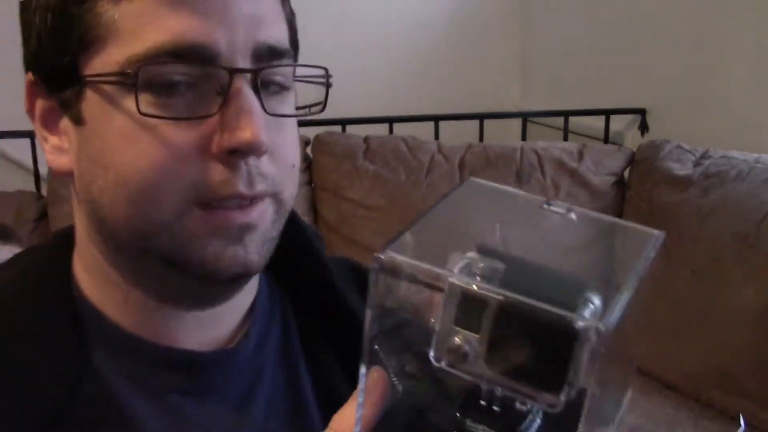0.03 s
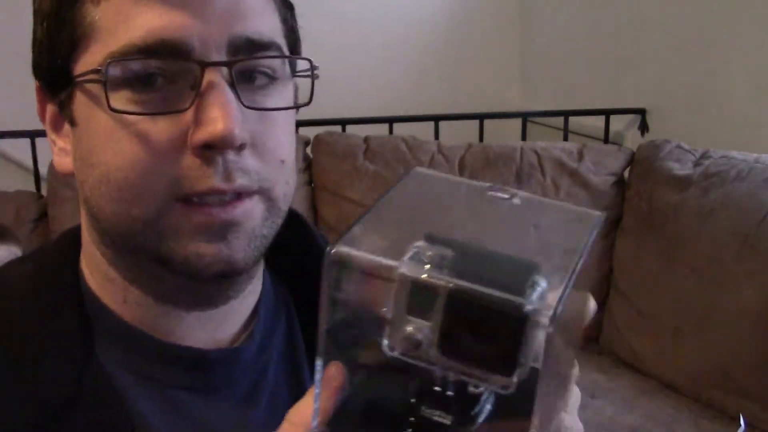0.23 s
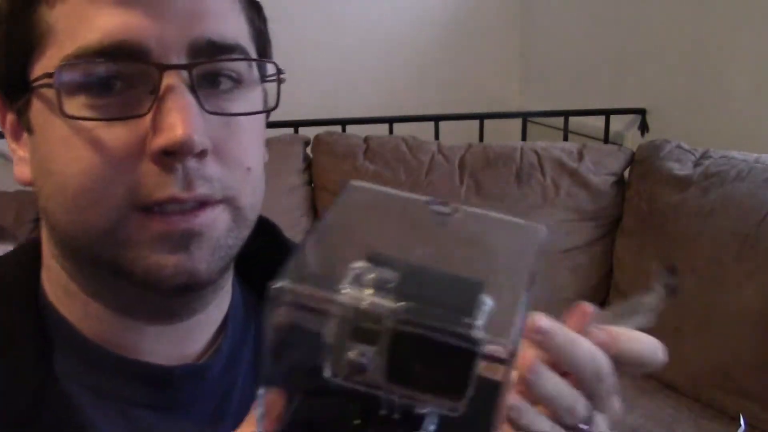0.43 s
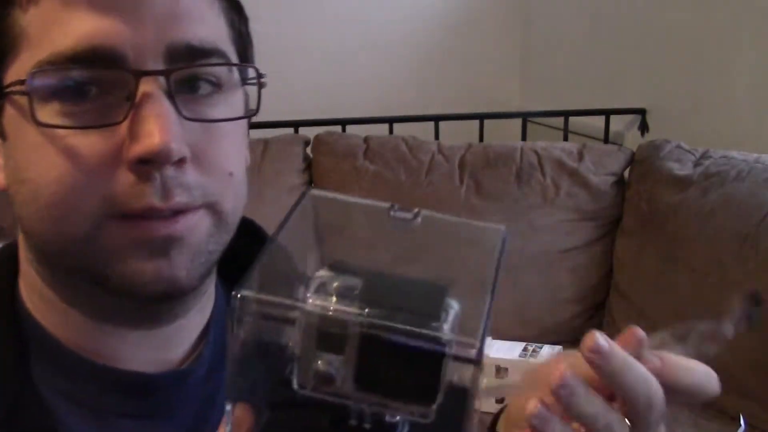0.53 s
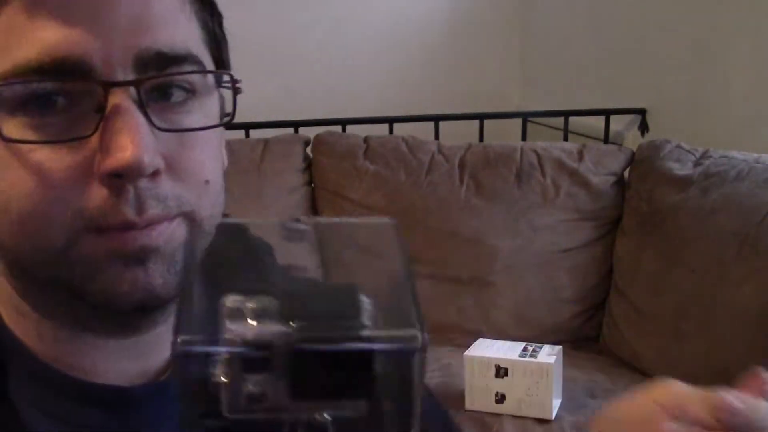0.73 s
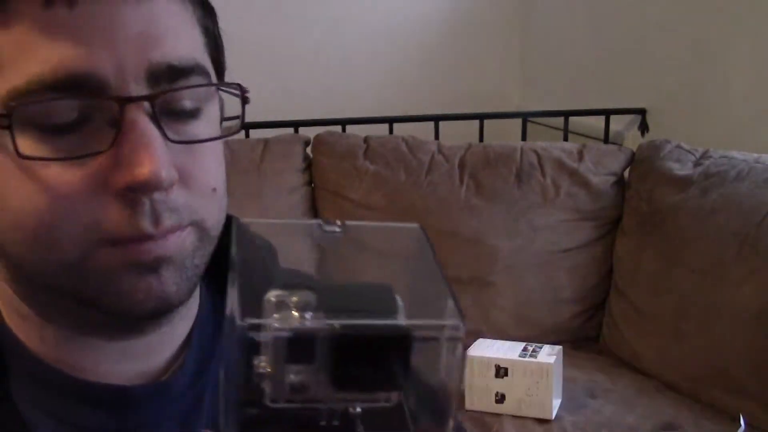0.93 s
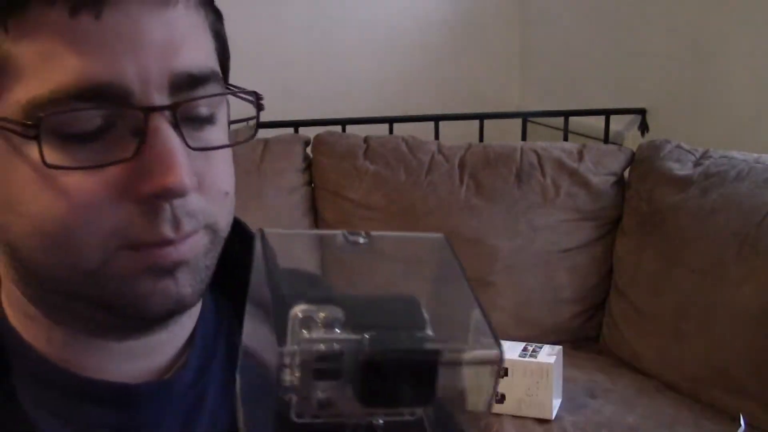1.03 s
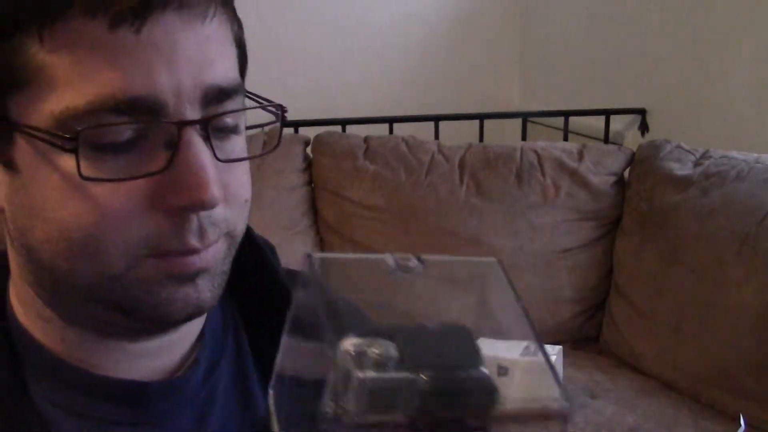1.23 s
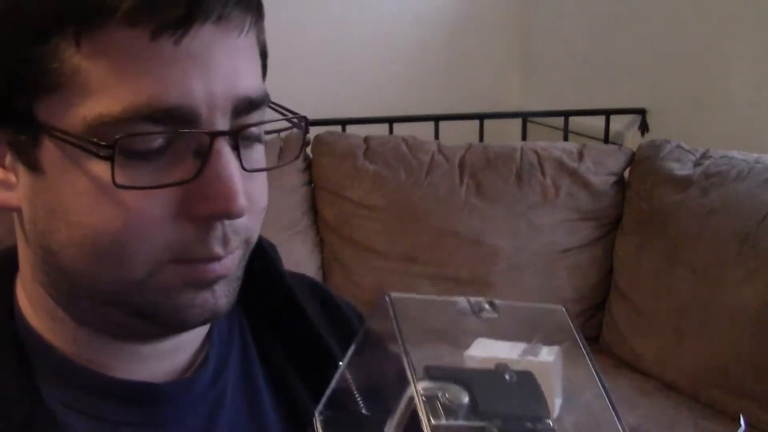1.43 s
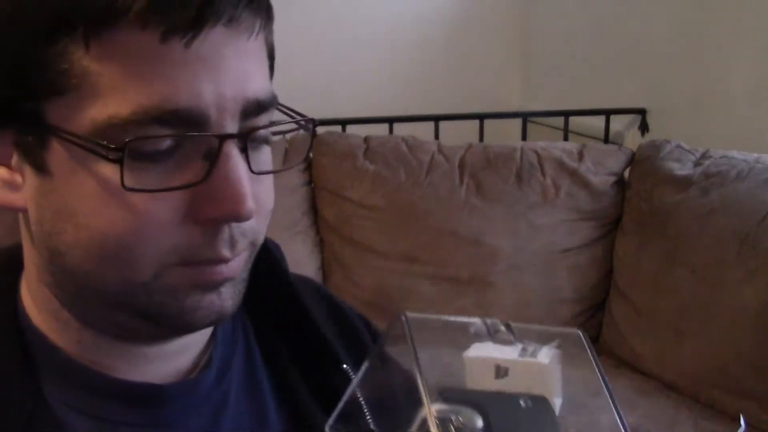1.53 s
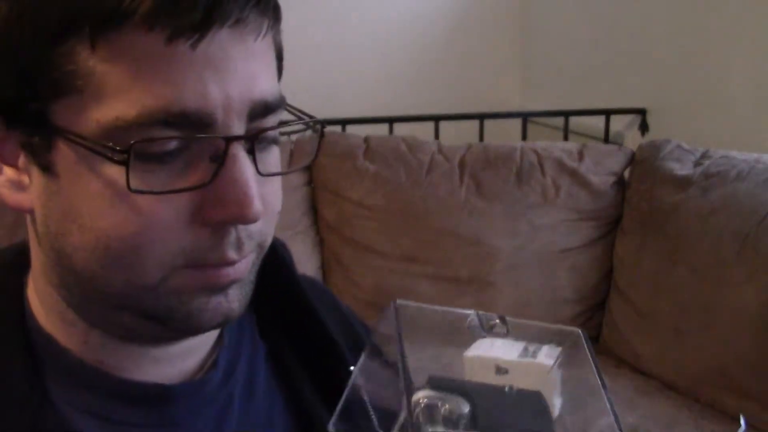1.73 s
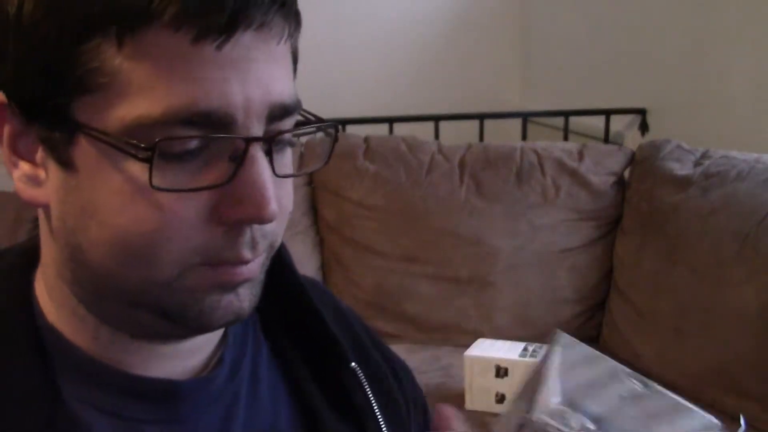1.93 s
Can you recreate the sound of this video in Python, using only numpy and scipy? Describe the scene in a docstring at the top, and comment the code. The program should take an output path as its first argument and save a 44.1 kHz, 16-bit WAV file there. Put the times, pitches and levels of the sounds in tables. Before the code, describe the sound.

Hard plastic packaging is torn open with raspy crackles, a sharp snap, clacks and small ticks

```python
"""Living room, close up: a sealing strip is ripped off a hollow hard plastic case in three pulls.
The strip sticks and slips: each slip is a burst of shaped noise and a kick to the decaying case modes.
The last pull snaps, with short pings, and runs into a bright rip. Knocks are a thump, clack and ring.
The freed case knocks about, then ticks and bumps softly in the hands; ticks are short filtered
contacts, the finger rub is gritty noise. Room echoes and a faint noise floor surround it."""
import sys
import numpy as np
from scipy import signal
from scipy.fft import rfft, irfft, next_fast_len
from scipy.io import wavfile
from scipy.ndimage import map_coordinates

SR = 44100
rng = np.random.default_rng(int(sys.argv[2]) if len(sys.argv) > 2 else 0)


def transcribe(u):
    """Save the signal u as a 16-bit wav file named by the first command-line argument.

    u: samples, shape (n,) or (channels, n), limited to [-1, 1]; the rate is SR.
    q: integer samples, one column per channel.
    """
    v = np.clip(np.atleast_2d(u).T, -1, 1)
    q = np.round(v * 32767).astype(np.int16)
    wavfile.write(sys.argv[1], SR, q)


N = 88200


def amp(db):
    """Decibels to gain."""
    return 10 ** (np.asarray(db) / 20)


def unit(x):
    """Scale to rms 1."""
    return x / np.sqrt(np.mean(x ** 2) + 1e-20)


def along(points, hz):
    """Interpolate (hz, value) points on a log-frequency axis."""
    point_hz, value = np.transpose(points)
    return np.interp(np.log(hz + 1), np.log(point_hz + 1), value)


def colour(x, points):
    """Minimum-phase filter with the given (hz, db) shape, built by folding the cepstrum."""
    m = 2 * next_fast_len(x.shape[-1])
    log_gain = np.log(amp(along(points, np.fft.rfftfreq(m, 1 / SR))))
    cepstrum = irfft(log_gain, m)
    cepstrum[1:m // 2] *= 2
    cepstrum[m // 2 + 1:] = 0
    response = np.exp(rfft(cepstrum))
    return irfft(rfft(x, m) * response, m)[..., :x.shape[-1]]


def highpass(x, order, hz):
    """Causal Butterworth high-pass."""
    return signal.sosfilt(signal.butter(order, hz, 'high', fs=SR, output='sos'), x)


def fade(t_s, t60_s):
    """Exponential decay by 60 dB in t60_s."""
    return np.exp(-np.log(1000) * t_s / t60_s)


def decaying_sine(t_s, hz, t60_s):
    """One damped mode."""
    return fade(t_s, t60_s) * np.sin(2 * np.pi * hz * t_s)


def add(out, start_s, x):
    """Mix x into out from start_s."""
    i = int(round(start_s * SR))
    n = min(x.shape[-1], out.shape[-1] - i)
    out[..., i:i + n] += x[..., :n]


# side level of diffuse sound: [hz, side_db]
SIDE_WIDTH = [(30, -12.5), (100, -10), (350, -23.5), (1000, -19.5), (4000, -14), (9000, -5), (14000, -3.5)]


def diffuse(pair):
    """Two unrelated signals as mid and side of one diffuse field."""
    side = colour(pair[1], SIDE_WIDTH)
    return np.array([pair[0] + side, pair[0] - side])


# spectrum of the background: [hz, level_db]
FLOOR_TONE = [(20, -42.5), (45, -39.5), (70, -19), (130, -12.5), (200, -11.5), (270, -9.5), (350, -6),
              (450, -7), (600, -8), (800, -9), (1050, -12.5), (1600, -12), (2200, -16), (3400, -25),
              (4500, -32.5), (16000, -50.5)]
FLOOR_MID_DB, FLOOR_SLOPE_DB_PER_S = -51, -2


def background():
    """Diffuse coloured noise whose level falls slowly."""
    floor = amp(FLOOR_MID_DB) * unit(diffuse(colour(rng.standard_normal((2, N)), FLOOR_TONE)))
    from_middle_s = (np.arange(N) - N / 2) / SR
    return floor * amp(FLOOR_SLOPE_DB_PER_S * from_middle_s)


def contact(tone, t60_s, rough):
    """One push with a brief rough aftershock, coloured by the tone; peak 1."""
    t = np.arange(SR // 8) / SR
    push = rng.standard_normal(len(t)) * fade(t, t60_s)
    push *= rough / np.linalg.norm(push)
    push[0] += 1
    x = colour(push, tone)
    return x / np.abs(x).max()


# finger rub before flutter: [time_s, level_db]
RUB_LEVEL = [(0, -72), (.2, -57), (.65, -56), (1.0, -60), (1.09, -64), (1.14, -68), (1.17, -49),
             (1.2, -71.5), (1.3, -68.5), (1.34, -60), (1.41, -60), (1.45, -78), (1.52, -70.5),
             (1.56, -62.5), (1.63, -59.5), (1.71, -84), (2, -86)]
# spectrum of the rub: [hz, level_db]
RUB_TONE = [(300, -10.5), (2000, 1.5), (4000, 0), (5400, -7.5), (6500, -0.5), (8000, -2.5), (12000, -7),
            (16000, -21)]
RUB_GRAIN = .65  # log spread of sample size: grittiness


def finger_rub(flutter_db=5.0, flutter_points_per_s=90):
    """Fingers sliding on the case: uneven noise grains with a fluttering level."""
    t = np.arange(N) / SR
    flutter = map_coordinates(rng.standard_normal(size=1000), [t * flutter_points_per_s], mode='wrap')
    grit = rng.standard_normal(N) * np.exp(RUB_GRAIN * rng.standard_normal(N))
    level_db = np.interp(t, *np.transpose(RUB_LEVEL))
    return unit(colour(grit, RUB_TONE)) * amp(level_db + flutter_db * flutter)


# plastic on plastic: [start_s, level_db, pitch_hz]
TICKS = [(.034, -43, 3820), (.076, -42, 3540), (1.071, -17.5, 7800), (1.1125, -32, 3750),
         (1.1195, -31, 7070), (1.162, -42, 3320), (1.165, -39, 5950), (1.17, -37.5, 3850),
         (1.172, -34, 6800), (1.1885, -42, 7900), (1.3225, -40.5, 7100), (1.340, -41.5, 7000),
         (1.349, -42, 6960), (1.356, -44, 6700), (1.3695, -38, 7500), (1.3845, -40, 7000),
         (1.397, -34.5, 8520), (1.4725, -40.5, 6960), (1.508, -27.5, 3760), (1.622, -31, 3130),
         (1.623, -34.5, 7900), (1.636, -42, 5050), (1.995, -34.5, 7000)]
# tick spectrum: [multiple_of_pitch, level_db]
TICK_SHAPE = [(.1, -42), (.55, -14.5), (.68, -1.5), (.82, -8), (1, 1), (1.2, -9), (2, -17.5), (4, -41.5)]


def ticks():
    """Small dry contacts, each with a spectral peak about its own pitch."""
    out = np.zeros(N)
    for start_s, level_db, pitch_hz in TICKS:
        tone = [(pitch_hz * multiple, db) for multiple, db in TICK_SHAPE]
        add(out, start_s, amp(level_db) * contact(tone, t60_s=0.0016, rough=0.4))
    return out


# modes of the hollow case: [mode_hz, level_db, t60_s]
CASE_MODES = [(358.6, 3.5, 0.11), (466.5, 3, 0.2), (584, 2, 0.095), (715, -8.5, 0.064), (905, -16, 0.1),
              (974, -10, .08), (1618, 0.5, 0.023), (2580, -4.5, .08)]
MODE_FALL_DB_PER_OCT = 9  # away from the pitch of the touch


def case_ring(centre_hz, scatter_db=1.5, low_hz=300):
    """Damped case modes: a touch rings most those near its pitch, a little differently each time."""
    t = np.arange(SR // 3) / SR
    ring = np.zeros(len(t))
    for mode_hz, level_db, t60_s in CASE_MODES:
        fall_db = MODE_FALL_DB_PER_OCT * abs(np.log2(mode_hz / centre_hz))
        mode_db = level_db + scatter_db * rng.standard_normal() - fall_db
        ring += amp(mode_db) * decaying_sine(t, mode_hz, t60_s)
    return highpass(ring, 4, low_hz)


SLIP_REF_DB, RATE_DOUBLING_DB = -22, 9.5  # level at the nominal slip rate; rise that doubles it
SLIP_JITTER, SLIP_SCATTER_DB = .12, 1.0  # log spread of the gaps; spread of the sizes
SLIP_RISE_S, SLIP_T60_S = .001, .011


def pull(curve, tone, tear_db, gain_db, case_db, case_hz, slips_per_s, treble_hz=5500, grain=.25):
    """Stick-slip at an uneven rate: each slip is tiny breaks in the glue and a kick to the case."""
    time_s, curve_db, treble_db = np.transpose(curve)
    t = np.arange(time_s[0], time_s[-1], 1 / SR)
    level_db = np.interp(t, time_s, curve_db)
    effort = amp(level_db + gain_db)

    # louder pulling slips faster; a slip falls where the running slip count passes a jittered step
    rate = slips_per_s * 2 ** ((level_db - SLIP_REF_DB) / RATE_DOUBLING_DB)
    chance = rng.standard_normal(size=(200, 2))
    gaps = np.exp(SLIP_JITTER * chance[:, 0])
    at = np.searchsorted(np.cumsum(rate) / SR, np.cumsum(gaps) - gaps[0])
    inside = at < len(t)
    sizes = amp(SLIP_SCATTER_DB * chance[inside, 1]) / np.sqrt(rate[at[inside]])
    slips = np.bincount(at[inside], sizes, len(t))

    slip_shape = fade(t - t[0], SLIP_T60_S) * (1 - np.exp((t[0] - t) / SLIP_RISE_S))
    power = signal.fftconvolve(slips ** 2, slip_shape ** 2)[:len(t)]
    envelope = unit(np.sqrt(np.abs(power)))
    breaks = unit(rng.standard_normal(N) * np.exp(grain * rng.standard_normal(N)))[:len(t)]
    burst = effort * (envelope + amp(tear_db)) * breaks
    crackle = colour(np.pad(burst, (0, SR // 8)), tone)
    crackle *= np.linalg.norm(effort) / np.linalg.norm(crackle)

    treble_filter = signal.butter(2, treble_hz, 'high', fs=SR, output='sos')
    treble = signal.sosfiltfilt(treble_filter, crackle, padtype=None)
    crackle_s = time_s[0] + np.arange(len(crackle)) / SR
    treble_gain = amp(np.interp(crackle_s, time_s, treble_db - treble_db.mean()))
    crackle += treble * (treble_gain - 1)

    body = signal.fftconvolve(slips * effort, case_ring(case_hz))
    body *= amp(case_db) * np.linalg.norm(effort) / np.linalg.norm(body)
    out = np.zeros(N)
    add(out, time_s[0], crackle)
    add(out, time_s[0], body)
    return out


# strip pulls: [time_s, level_db, treble_db], treble taken relative to the pull's mean
FIRST_PULL = [(.235, -24, -21.5), (.240, -19.5, -13), (.249, -23.5, 1), (.253, -28.5, -2.5),
              (.258, -22, -6), (.267, -25, 0.5), (.271, -19.5, -16), (.295, -17.5, -15),
              (.302, -30.5, -7.5), (.309, -23, 1), (.321, -31.5, -18.5), (.335, -21, -18.5),
              (.342, -22, -8)]
SECOND_PULL = [(.3955, -18, -7), (.407, -19.5, -16), (.419, -22.5, -14), (.426, -33.5, 5.5),
               (.436, -24, -8), (.450, -27, -7.5), (.468, -23, -4), (.493, -22, -11), (.502, -19, -5.5),
               (.521, -23, -1.5), (.532, -20.5, -2), (.551, -24, -8.5), (.559, -28.5, 8.5)]
LAST_PULL = [(0.739, -17, 2), (0.753, -19, -2.5), (0.771, -13.5, 3.5), (0.795, -12.5, -2),
             (0.816, -15.5, -16)]
# crackle spectrum of each pull: [hz, level_db]
FIRST_TONE = [(60, -37), (200, -28), (290, -21.5), (370, 3), (620, -4.5), (800, 2.5), (1100, -4.5),
              (1900, -6), (3300, -3), (5500, -7.5), (7800, -7.5), (13000, -18), (16000, -33)]
SECOND_TONE = [(60, -37), (200, -29.5), (290, -23), (370, -3.5), (620, -5), (900, -8), (2000, -9.5),
               (2700, -4), (4500, -12), (6900, -6), (10000, -17), (13500, -24), (16000, -37)]
LAST_TONE = [(59, -70.5), (100, -28.5), (461, -3.5), (991, -7), (1230, -5.5), (1330, -8.5), (2170, -5),
             (2630, -7.5), (2990, -6), (5770, -9), (8110, -5), (13200, -14.5), (16000, -25.5)]
# tearing between the slips, relative to the slips: [first_db, second_db, last_db]
TEAR_DB = (-4, -15, 2)


def strip_pulls():
    """Two rasping pulls and the final rip, each with its own tone, slip rate and case pitch."""
    out = pull(FIRST_PULL, FIRST_TONE, TEAR_DB[0], gain_db=-0.5, case_db=-12.5, case_hz=780, slips_per_s=170)
    out += pull(SECOND_PULL, SECOND_TONE, TEAR_DB[1], gain_db=-0.5, case_db=-8, case_hz=420, slips_per_s=230)
    out += pull(LAST_PULL, LAST_TONE, TEAR_DB[2], gain_db=-2, case_db=-14.5, case_hz=600, slips_per_s=240)
    return out


# hollow case hits: [start_s, level_db, hardness_db, pitch_hz]
KNOCKS = [(.632, -32, -16, 421), (.837, -15, -3, 455), (0.8502, -8, 2, 536), (.858, -25.5, -5, 573),
          (0.868, -31.5, -19, 557), (0.883, -21, -5, 487), (.898, -20, 8.5, 470), (0.904, -20.5, -16, 463),
          (.914, -23, -14, 620), (0.93, -31, -7.5, 373), (.975, -34, -13, 386), (1.175, -33, 4, 603),
          (1.355, -37.5, -10, 493), (1.571, -29, 6, 467), (1.5881, -18.5, 3.5, 600), (1.611, -27, -15, 517),
          (1.625, -29.5, 8.5, 506), (1.636, -40, 7, 610), (1.77, -38, -6, 364), (1.841, -28, -6.5, 413),
          (1.959, -40, -4.5, 553)]
# thump spectrum: [multiple_of_pitch, level_db]
THUMP_SHAPE = [(.1, -46.5), (.25, -25.5), (.5, -18), (.73, 1.5), (1.05, 2), (1.5, -4), (2.5, -23.5),
               (6, -42.5), (18, -68.5)]
# clack spectrum: [hz, level_db]
CLACK_TONE = [(60, -44.5), (300, -23.5), (600, -5), (900, 6), (1150, -6.5), (1500, 1), (2800, -8),
              (4500, -22), (9000, -32.5), (16000, -44.5)]
# modes of the tabletop under the case: [mode_hz, level_db, t60_s]
TABLE_MODES = [(125, -44.5, 0.043), (263.5, -19, 0.18)]


def knocks(ring_db=-19, clack_db=-9):
    """A hollow thump, a clack as loud as the contact is hard, and the ring of case and table."""
    out = np.zeros(N)
    t = np.arange(SR // 3) / SR
    table = sum(amp(db) * decaying_sine(t, hz, t60_s) for hz, db, t60_s in TABLE_MODES)
    for start_s, level_db, hardness_db, pitch_hz in KNOCKS:
        thump_tone = [(pitch_hz * multiple, db) for multiple, db in THUMP_SHAPE]
        thump = contact(thump_tone, t60_s=0.039, rough=0.84)
        clack = contact(CLACK_TONE, t60_s=0.047, rough=1.97)
        ring = amp(ring_db) * case_ring(pitch_hz) + table
        add(out, start_s, amp(level_db) * thump)
        add(out, start_s, amp(level_db + hardness_db + clack_db) * clack)
        add(out, start_s, amp(level_db) * ring)
    return out


# strip letting go: [start_s, level_db]
SNAPS = [(.7318, -6), (.7370, -5), (.8105, -15), (.8135, -17)]
# snap spectrum: [hz, level_db]
SNAP_TONE = [(200, -38.5), (600, -12), (3000, -27.5), (6000, -23.5), (7500, -12), (8500, -7), (9300, -17.5),
             (10500, -19), (16000, -31.5)]
PING_HZ, PING_T60_S, PING_DB = 8700, .012, -3


def snaps():
    """Rough sharp contacts; the taut strip pings as it lets go."""
    out = np.zeros(N)
    t = np.arange(SR // 8) / SR
    ping = amp(PING_DB) * decaying_sine(t, PING_HZ, PING_T60_S)
    for start_s, level_db in SNAPS:
        add(out, start_s, amp(level_db) * (contact(SNAP_TONE, t60_s=0.01, rough=15) + ping))
    return out


SCATTER_DB, SCATTER_T60_S = -18.5, 0.00824


def direct(x):
    """Direct sound in stereo: a brief noise scatter, opposite in sign left and right, widens it."""
    t = np.arange(SR // 50) / SR
    scatter = rng.standard_normal(len(t)) * fade(t, SCATTER_T60_S)
    side = amp(SCATTER_DB) * signal.fftconvolve(x, scatter / np.linalg.norm(scatter))[:N]
    return np.array([x + side, x - side])


# decay of the room: [hz, t60_s]
ROOM_T60 = [(100, .35), (400, 0.38), (2000, 0.38), (6000, 0.41), (10000, 0.25), (16000, 0.13)]
# spectrum of the room's answer: [hz, level_db]
ROOM_TONE = [(100, 13.5), (400, -7), (1200, -3.5), (3000, -1.5), (8000, -7.5), (16000, 6)]
TAIL_DB, WALLS_DB, WALLS_T60_S = -9.5, -7.5, 0.088


def room(x, gap_s=0.0048):
    """Spiky, fast-fading near echoes over a noise tail that decays band by band."""
    hz, t, bands = signal.stft(rng.standard_normal((2, SR * 3 // 4)), SR, nperseg=256)
    bands = bands * fade(t, along(ROOM_T60, hz)[:, None])
    tail = signal.istft(bands, SR, nperseg=256)[1]
    t = np.arange(tail.shape[1]) / SR
    walls = rng.standard_normal(tail.shape) ** 3 * fade(t, WALLS_T60_S)  # cubing makes it spiky
    answer = amp(TAIL_DB) * tail / np.linalg.norm(tail[0])
    answer += amp(WALLS_DB) * walls / np.linalg.norm(walls[0])
    out = np.zeros((2, N))
    add(out, gap_s, signal.fftconvolve(x[None], diffuse(colour(answer, ROOM_TONE)), axes=1))
    return out


BASS_HZ = 121  # the small case radiates little below this
PAN_DB = -.3  # left gain; the right gets the opposite


def scene():
    """The case just right of centre, its room and the background."""
    sources = strip_pulls() + snaps() + knocks() + finger_rub() + ticks()
    case = highpass(sources, 3, BASS_HZ)
    floor = background()
    pan = amp(PAN_DB * np.array([[1], [-1]]))
    return (direct(case) + room(case)) * pan + floor


PEAK_LIMIT, TOP_HZ = .9, 15900


def record(dry):
    """Round the highest peaks, then remove everything above the band limit."""
    x = dry / (1 + np.abs(dry / PEAK_LIMIT) ** 6) ** (1 / 6)
    m = next_fast_len(N + SR // 2)
    in_band = np.fft.rfftfreq(m, 1 / SR) < TOP_HZ
    return irfft(rfft(x, m) * in_band, m)[..., :N]


dry = scene()
out = record(dry)
transcribe(out)
```